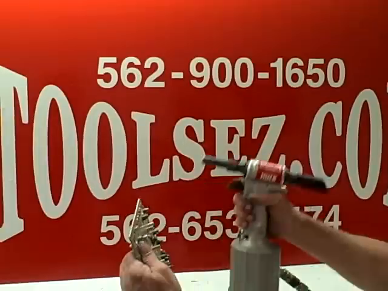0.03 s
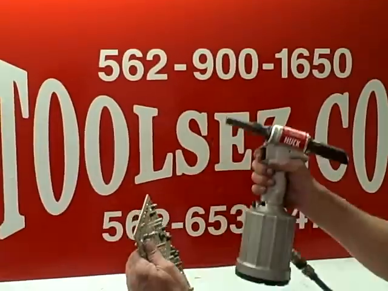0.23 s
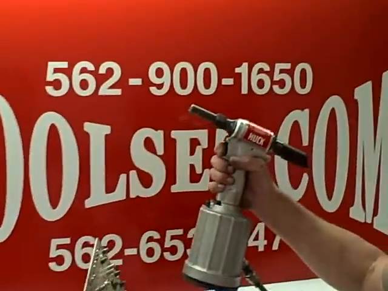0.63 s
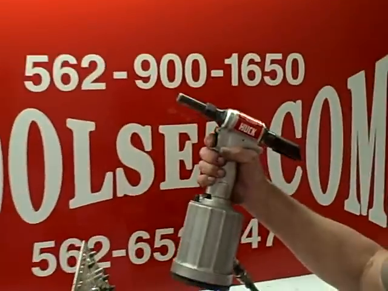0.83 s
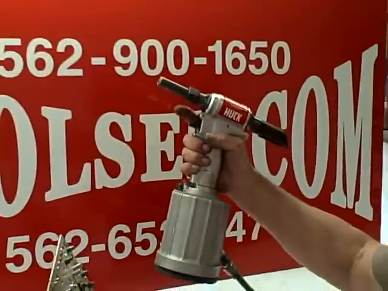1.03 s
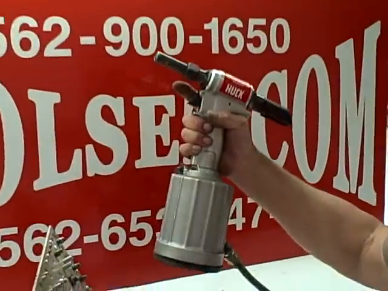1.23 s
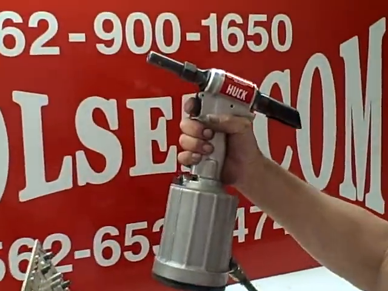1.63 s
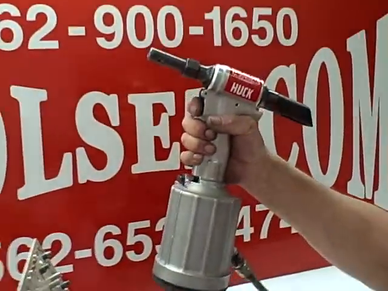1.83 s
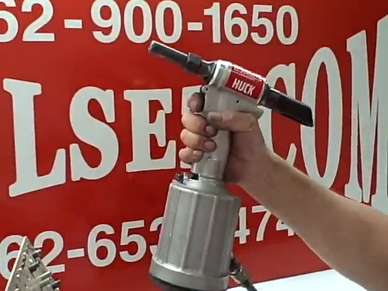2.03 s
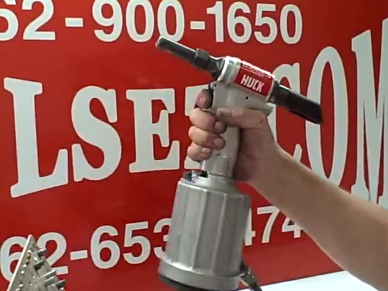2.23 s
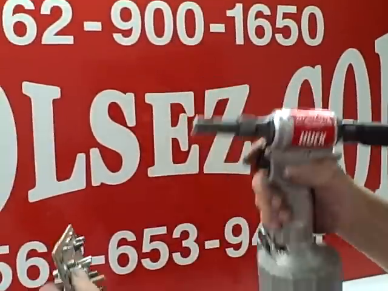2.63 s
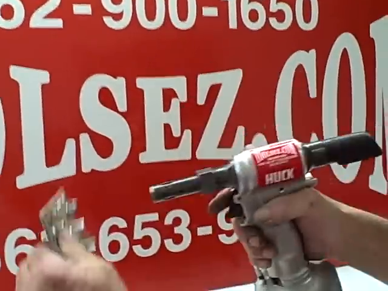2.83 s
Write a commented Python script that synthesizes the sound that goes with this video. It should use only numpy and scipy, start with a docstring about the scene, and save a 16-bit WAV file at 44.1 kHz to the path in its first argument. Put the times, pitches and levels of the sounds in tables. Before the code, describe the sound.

A pneumatic rivet tool gives four close, bright hisses of air, at about 0.2 to 0.8, 1.0 to 1.4, 1.7 to 2.2 and 2.3 to 2.7 seconds. Each starts with a soft valve thump, sinks slightly in pitch, then shuts off with a brief fading leak. High whistles glide through the bursts, and the piston ticks once near 2.1 seconds. A faint low room rumble and hum lie underneath.

```python
"""In a room with a low rumble and hum, a hand-held pneumatic rivet tool is triggered four times close by.
Each time the valve thumps and a turbulent jet hisses out through the exhaust, whose resonances sink
as the air chills and climb back while the last air bleeds away. Whistles glide as the piston travels,
and once it ticks against its stop. The loudest hiss just overloads the microphone."""
import sys
import numpy as np
from scipy import signal
from scipy.fft import rfft, irfft, next_fast_len
from scipy.io import wavfile
from scipy.ndimage import map_coordinates

SR = 44100
rng = np.random.default_rng(int(sys.argv[2]) if len(sys.argv) > 2 else 0)


def inscribe(sig):
    """Save sig as 16-bit PCM at rate SR to the path in sys.argv[1].

    A 1-D sig is mono; a 2-D sig holds one channel per row.
    Samples are clipped to [-1, 1] before scaling.
    """
    pcm = np.round(np.clip(np.atleast_2d(sig).T, -1, 1) * 32767)
    wavfile.write(sys.argv[1], SR, pcm.astype(np.int16))


N = 132300


def amp(db):
    """Amplitude ratio of a level in decibels."""
    return 10 ** (np.asarray(db) / 20)


def unit(x):
    """Normalisation to rms 1."""
    return x / np.sqrt(np.mean(np.abs(x) ** 2) + 1e-20)


def along(points, hz):
    """Interpolation of (f/Hz, value) points on a logarithmic frequency axis."""
    f, v = np.transpose(points)
    return np.interp(np.log(hz + 1), np.log(f + 1), v)


def filtered(x, response):
    """Linear filtering: the spectrum of x times a frequency response."""
    size = next_fast_len(N + SR // 2)
    return irfft(rfft(x, size) * response(np.fft.rfftfreq(size, 1 / SR)), size)[:N]


def noise(spectrum):
    """White noise shaped by (f/Hz, relative level/dB) points; rms 1."""
    return unit(filtered(rng.standard_normal(N), lambda hz: amp(along(spectrum, hz))))


def wobble(hz):
    """Random modulation: a spline through hz Gaussian values a second."""
    return map_coordinates(rng.standard_normal(N // 20), [np.arange(N) * hz / SR], mode="wrap")


def resonance(hz, width_hz):
    """A noise-driven resonance: narrow-band noise in quadrature about a centre that may move; rms 1."""
    skirt = lambda f: 1 / (1 + (f / width_hz) ** 2)
    in_phase, quadrature = (filtered(rng.standard_normal(N), skirt) for _ in range(2))
    phase = 2 * np.pi * np.cumsum(hz * np.ones(N)) / SR
    return unit(in_phase * np.cos(phase) + quadrature * np.sin(phase))


def rise(t, seconds):
    """First-order step response: from 0 towards 1 once t is positive."""
    return 1 - np.exp(-np.maximum(t, 0) / seconds)


def background(t):
    """Stationary ambient noise: broadband rumble and hiss with a pure-tone hum."""
    # room noise spectrum: f/Hz, relative level/dB
    rumble_spectrum = [(20, 6), (55, 0), (80, -15), (250, -19), (450, -25), (800, -37), (3000, -37),
                       (7000, -35), (8500, -41), (9500, -55)]
    rumble_db, hum_hz, hum_db = -44, 58, -52
    hum = unit(np.sin(2 * np.pi * hum_hz * t))
    return amp(rumble_db) * noise(rumble_spectrum) + amp(hum_db) * hum


def reverberation(x):
    """Convolution with a diffuse tail in which each frequency decays exponentially at its own rate."""
    # reverberation time: f/Hz, T60/s
    decay_times = [(200, .4), (2000, .39), (7000, .36)]
    hz, t, spectra = signal.stft(rng.standard_normal(SR // 2), SR, nperseg=256)
    decay = amp(-60 * t / along(decay_times, hz)[:, None])
    _, tail = signal.istft(spectra * decay, SR, nperseg=256)
    return signal.fftconvolve(x, tail / np.linalg.norm(tail))[:N]


def piston_tick(t):
    """Impact: the piston strikes its stop, giving a noise pulse that decays exponentially."""
    # impact spectrum: f/Hz, relative level/dB
    tick_spectrum = [(500, -25), (1800, -3), (3000, 0), (4500, 0), (8000, -20), (9300, -50)]
    strike_s, level_db, decay_s = 2.098, -15, .002
    envelope = (t > strike_s) * (1 - rise(t - strike_s, decay_s))
    return amp(level_db) * envelope * noise(tick_spectrum)


def piston_whistles(t):
    """Flow-excited resonances swell, glide and fade as the piston travels."""
    # whistles: start t/s, end t/s, first f/Hz, last f/Hz, width/Hz, level/dB
    glides = [(.222, .32, 5100, 3950, 450, -17), (.28, .44, 6000, 4750, 220, -19),
              (.76, .96, 4850, 5150, 45, -42), (1.14, 1.36, 5150, 4700, 130, -22.5),
              (2.15, 2.33, 5900, 6150, 90, -36.5), (2.35, 2.52, 5950, 5580, 150, -17),
              (2.42, 2.52, 4900, 4520, 140, -23.5), (2.50, 2.62, 4750, 5450, 160, -22)]
    sound = np.zeros(N)
    for start, end, first_hz, last_hz, width_hz, db in glides:
        travel = np.clip((t - start) / (end - start), 0, 1)
        swell = 2 * np.sqrt(travel * (1 - travel))
        sound += amp(db) * swell * resonance(first_hz + (last_hz - first_hz) * travel, width_hz)
    return sound


def valve_kicks(t):
    """Pressure transients of the valve: a heavily damped low thump and a sharp spit of air."""
    # valve kicks: t/s, thump level/dB, spit level/dB (both before the envelope)
    kicks = [(.205, -29, -13.5), (.985, -21.5, -11.5), (1.349, -27.5, -20), (1.712, -42, -19),
             (2.350, -19.5, -12), (2.703, -28, -19)]
    # spectrum of the spit, thinner than the full jet: f/Hz, relative level/dB
    spit_spectrum = [(100, -20), (3000, -20), (4400, -14), (5200, -1), (6600, 0), (7500, -6), (8500, -22),
                     (9300, -55)]
    thump_hz, thump_rise_s, thump_decay_s = 105, .002, .008
    spit_rise_s, spit_decay_s = .0015, .007
    thump, spit = np.zeros((2, N))
    for start, thump_db, spit_db in kicks:
        age = t - start
        thump_envelope = 2 * rise(age, thump_rise_s) * (1 - rise(age, thump_decay_s))
        spit_envelope = 2 * rise(age, spit_rise_s) * (1 - rise(age, spit_decay_s))
        thump += amp(thump_db) * thump_envelope * np.sin(2 * np.pi * thump_hz * age)
        spit += amp(spit_db) * spit_envelope
    return thump + spit * noise(spit_spectrum)


def airflow(t):
    """Discharge through a valve: five envelopes, and a pitch factor as chilling slows the sound in air."""
    # trigger pulls (the first ends before t = 0): valve cracks t/s, opens fully t/s, shuts t/s, level/dB,
    # initial shortfall/dB, final sag/dB; port tone in the blast, bleed and port tone in the bleed,
    # each as relative level/dB; limiting fractional pitch drop
    pulls = [(-.65, -.63, -.12, -12, 0, 4, -7, -14.5, -24, .03),
             (.202, .226, .766, -10.7, 5, 5.4, -1, -19.5, -16, .06),
             (.979, .985, 1.354, -12.5, 0, 4.8, 0, -19, -16, .062),
             (1.690, 1.712, 2.162, -12.4, 6, 3.5, -5.5, -18.5, -23, .07),
             (2.343, 2.350, 2.712, -11.8, 0, 9.5, -3, -19.5, -26, .035)]
    half_open, attack_s, release_s = amp(-7), .003, .007
    build_s, sag_power = .045, 1.8
    bleed_db_per_s, port_db_per_s, ring_db_per_s = 88, 74, 58
    chill_s, warm_s = .11, .11
    blast, blast_port, bleed, bleed_port, ring, drop = np.zeros((6, N))
    for crack, full, shut, db, build_db, sag_db, port_db, bleed_db, bleed_port_db, chill in pulls:
        valve = half_open * rise(t - crack, attack_s) + (1 - half_open) * rise(t - full, attack_s)
        closed, since_shut = rise(t - shut, release_s), np.maximum(t - shut, 0)
        spent = np.clip((t - full) / (shut - full), 0, 1)
        shortfall_db = build_db * (1 - rise(t - full, build_s))
        flow = valve * (1 - closed) * amp(db - sag_db * spent ** sag_power - shortfall_db)
        blast += flow
        blast_port += flow * amp(port_db)
        bleed += closed * amp(db + bleed_db - bleed_db_per_s * since_shut)
        bleed_port += closed * amp(db + bleed_port_db - port_db_per_s * since_shut)
        ring += closed * amp(db - ring_db_per_s * since_shut)
        drop += chill * rise(t - crack, chill_s) * np.exp(-since_shut / warm_s)
    return blast, blast_port, bleed, bleed_port, ring, 1 - drop


def exhaust(t):
    """Turbulent jet noise with port and chamber resonances: broad in the blast, narrow in the bleed."""
    # spectrum of the full jet: f/Hz, relative level/dB
    jet_spectrum = [(30, -18), (120, -16), (300, -16.5), (1000, -16.7), (2200, -15.6), (3400, -15),
                    (4250, -12.5), (4780, -5.6), (5600, -3.5), (6400, 0), (6950, -.3), (7500, -5.4),
                    (8000, -15.7), (8500, -20), (8900, -29), (9400, -55)]
    # spectrum of the last escaping air: f/Hz, relative level/dB
    bleed_spectrum = [(100, -12), (1000, -14), (3200, -13), (4500, -5), (5600, -4), (7000, 0), (7500, -3),
                      (8000, -14), (8500, -17), (9200, -50)]
    # air chamber modes: f/Hz at rest; width/Hz, relative level/dB in the blast; the same in the bleed
    chamber_modes = [(2090, 120, -37, 20, -45), (2920, 120, -33, 25, -49), (3640, 200, -26, 22, -36),
                     (5170, 150, -11, 35, -33), (5420, 200, -16, 40, -36), (6400, 260, -11, 130, -32),
                     (7660, 300, -20, 110, -43)]
    port_hz = 6630  # at rest
    flutter_db, flutter_hz, sputter_db, sputter_hz = .6, 35, 1.1, 350
    blast, blast_port, bleed, bleed_port, ring, pitch = airflow(t)
    air = blast * noise(jet_spectrum) + bleed * noise(bleed_spectrum)
    air += blast_port * resonance(port_hz * pitch, width_hz=230)
    air += bleed_port * resonance(port_hz * pitch, width_hz=85)
    for hz, blast_width, blast_db, bleed_width, bleed_db in chamber_modes:
        air += blast * amp(blast_db) * resonance(hz * pitch, blast_width)
        air += ring * amp(bleed_db) * resonance(hz * pitch, bleed_width)
    return air * amp(flutter_db * wobble(flutter_hz) + sputter_db * wobble(sputter_hz))


def scene():
    """Superposition of the background, the tool's direct sound and its reverberant field."""
    t = np.arange(N) / SR
    reverberant_db = -15
    tool = exhaust(t) + piston_whistles(t) + valve_kicks(t) + piston_tick(t)
    return (background(t) + tool + amp(reverberant_db) * reverberation(tool))[None]


def record(dry):
    """Microphone response: treble roll-off, soft saturation of the peaks, then a band limit."""
    # treble response: f/Hz, level/dB
    rolloff = [(8700, 0), (9400, -25), (10500, -60)]
    ceiling, knee, top_hz = .7, 14, 16100
    dulled = filtered(dry[0], lambda hz: amp(along(rolloff, hz)))
    saturated = dulled / (1 + np.abs(dulled / ceiling) ** knee) ** (1 / knee)
    return filtered(saturated, lambda hz: np.clip((top_hz - hz) / 300, 0, 1))[None]


dry = scene()
out = record(dry)
inscribe(out)
```